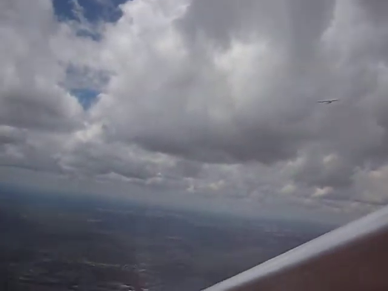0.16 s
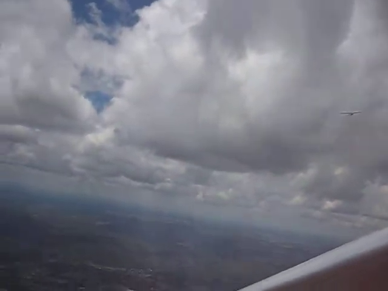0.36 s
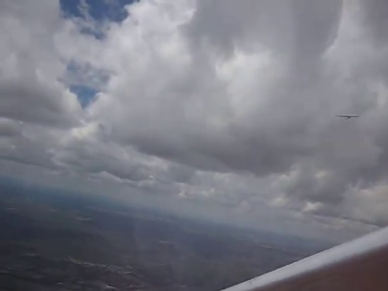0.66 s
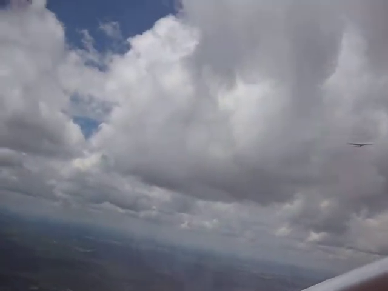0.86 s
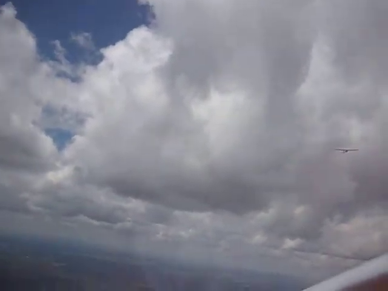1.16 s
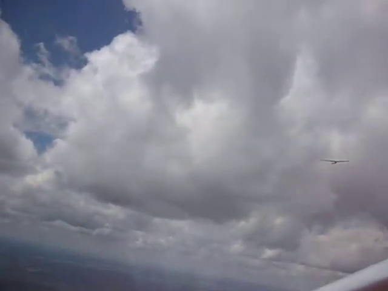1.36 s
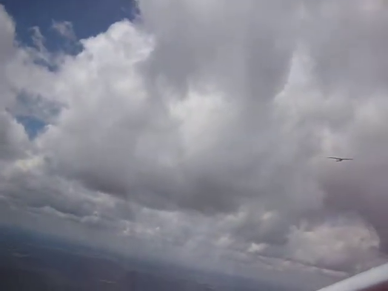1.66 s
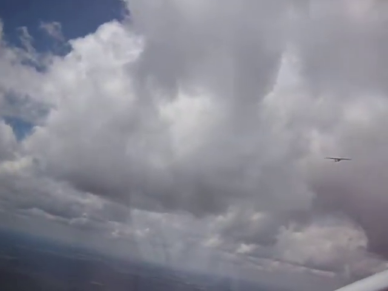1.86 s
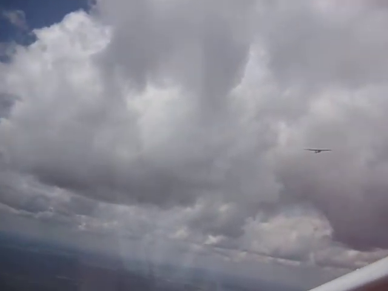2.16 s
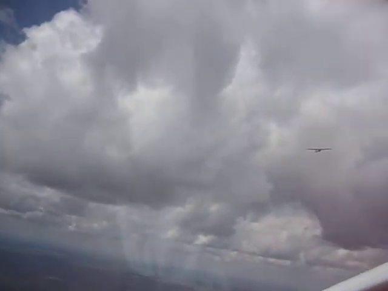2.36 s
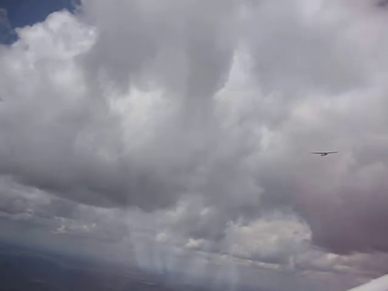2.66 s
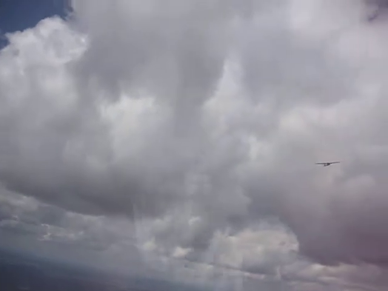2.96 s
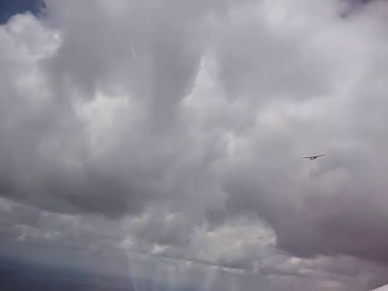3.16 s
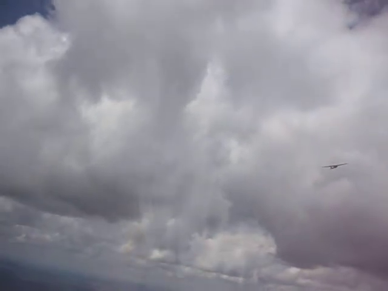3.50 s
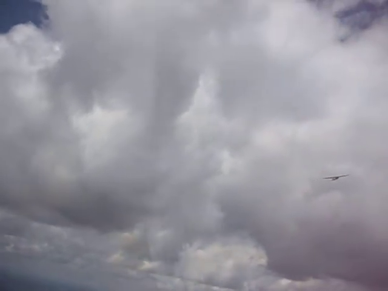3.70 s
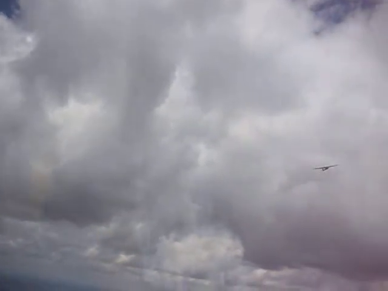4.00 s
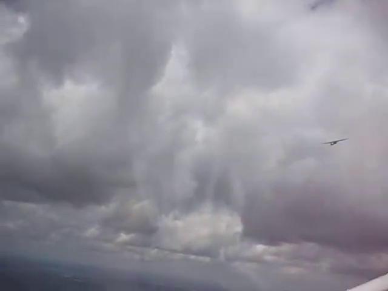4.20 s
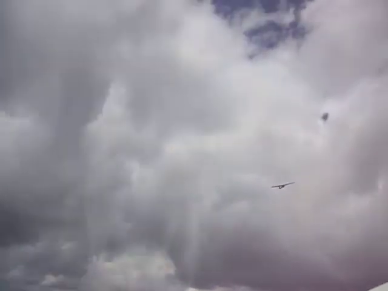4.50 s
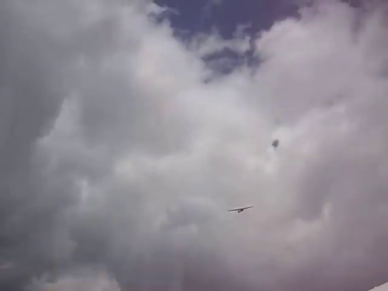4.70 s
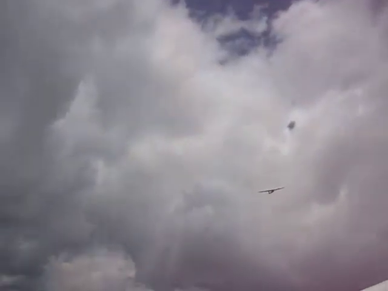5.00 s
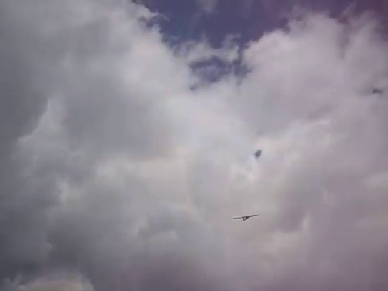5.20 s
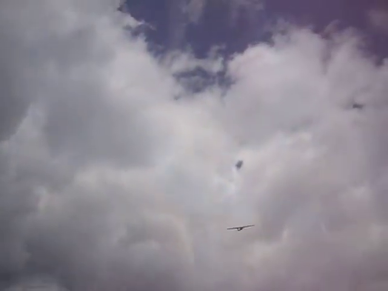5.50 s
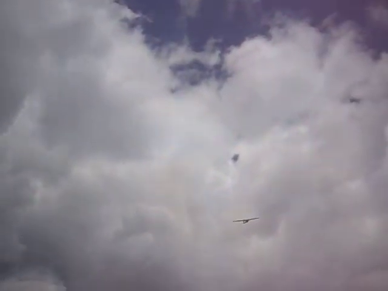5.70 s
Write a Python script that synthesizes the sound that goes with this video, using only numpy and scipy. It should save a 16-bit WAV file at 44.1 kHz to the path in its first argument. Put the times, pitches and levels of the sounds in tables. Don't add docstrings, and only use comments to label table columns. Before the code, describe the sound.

Steady wind rush heard inside a glider cockpit, deep rumbling and buffeting under a dull airy hiss, with one faint click midway.

```python
import sys
import numpy as np
from scipy import signal
from scipy.fft import rfft, irfft
from scipy.io import wavfile
from scipy.ndimage import uniform_filter1d

SR = 44100
rng = np.random.default_rng(int(sys.argv[2]) if len(sys.argv) > 2 else 0)


def to_linear_factor(level_db):
    exponent = np.asarray(level_db, float) / 20
    return 10 ** exponent


def persist_wave(psi):
    counts = np.round(np.clip(psi, -1, 1) * 32767).astype(np.int16)
    wavfile.write(sys.argv[1], SR, np.atleast_2d(counts).T)


N = 257984


def evened(x):
    return x / np.sqrt(np.mean(abs(x) ** 2) + 1e-20)


def read(points, hz):
    point_hz, point_db = np.transpose(points)
    return np.interp(np.log(hz + 1), np.log(point_hz + 1), point_db)


def camera_facing(t):
    # time in seconds, facing from 0 (away from the canopy) to 1 (towards it).
    turns = [
        (0, 0.46),
        (0.801, 0.16),
        (1.4, 0.091),
        (1.801, 0.59),
        (2.602, 0.71),
        (3.401, 1),
        (4.4, .9),
        (4.799, 0.28),
        (5.401, 0.35),
        (5.85, 0.52),
    ]
    return np.interp(t, *np.transpose(turns))


def flow(t, mean_db, share, facing_db):
    # time in seconds, level in dB.
    stream = [(0, -33), (.13, -30.5), (.3, -32.5), (.5, -31.5), (.78, -34), (1.14, -31.5), (1.45, -33.5),
              (1.75, -31.5), (2.02, -30), (2.24, -32.5), (2.5, -30.5), (3.0, -30.5), (3.62, -31.5),
              (3.9, -30.5), (4.53, -31), (4.72, -35), (5.2, -33), (5.72, -31.5)]
    stream_mean_db = -33
    swing_db = np.interp(t, *np.transpose(stream)) - stream_mean_db
    return mean_db + share * swing_db + facing_db * (camera_facing(t) - 0.5)


def lulls(t, column):
    # centre in seconds, thud change in dB, buffet change in dB, drumming change in dB.
    pockets = [(0.0, -4, -1.5, 0.5), (0.45, -0.7, -3.5, 0.6), (0.95, -4.5, 1.7, 0), (1.1, .1, -1.5, 0.5),
               (1.3, 2, 1.7, -0.7), (1.48, -6.5, 1, -1), (1.76, 1, -5, .8), (2.05, -3.5, 0.5, -0.3),
               (2.3, -1.5, -2, -0.1), (2.75, -2.5, 2.2, 0.5), (2.99, 1.8, -4.5, -0.5), (3.1, -1.5, .1, 1.4),
               (3.62, -5.5, 0, -0.5), (3.9, 0.5, 2.5, -1.1), (4.25, 1.5, 1.5, 0.5), (4.88, -1.3, -2, -0.6),
               (5.15, -1, -1.1, .6), (5.38, 2.5, 0.4, 0), (5.5, -5, -4.5, -0.8), (5.68, -0.2, -0.3, 1),
               (5.85, 2.5, 3, -1)]
    width_s = 0.09
    return sum(row[column] * np.exp(-0.5 * ((t - row[0]) / width_s) ** 2) for row in pockets)


def cockpit_rings(hz, facing):
    # frequency in Hz, width in Hz, gain facing away in dB,
    # gain facing the canopy in dB (negative gains thin the sound, as at a node).
    cockpit_modes = [(33, 14, 6, 3), (66, 24, 4.5, 7), (121, 75, 4, 0), (253.8, 70, 6, 9.5),
                     (318, 5.7, 8, 3), (389, 16, 10, -5), (395, 10, -5.5, -2.5), (457.7, 60, 7.5, 9.5),
                     (551.5, 29, 7, 10.5), (578, 12, -8.5, -3.5), (640, 100, 2.5, 2.5), (709, 68, 4, 5),
                     (759, 30, -4, -3.5), (818, 52, 2, 6.5), (884, 33, 3, -0.5), (1098, 44, 6.5, 3.5),
                    (1226, 52, 5.5, 6), (1326, 80, 5, 5), (1786, 46, 1.5, 6), (1860, 79, 3, -1),
                    (2130, 88, 0, 3.5), (2720, 67, -1.5, 4), (3030, 94, -0.5, 3)]
    rings_db = 0
    for mode_hz, width_hz, away_db, toward_db in cockpit_modes:
        peak = 1 / (1 + (2 * (hz - mode_hz) / width_hz) ** 2)
        rings_db = rings_db + np.outer(peak, away_db + facing * (toward_db - away_db))
    return rings_db


def turbulence(spectrum, size, patchy_db, flicker_db, patch_hz):
    hop = size // 4
    frames = N // hop + 5
    hz = np.fft.rfftfreq(size, 1 / SR)
    real, imaginary, patches = rng.standard_normal((frames, len(hz), 3)).T
    span = max(int(patch_hz * size / SR), 1)
    patches = uniform_filter1d(patches, size=span, axis=0)
    patches = evened(uniform_filter1d(patches, size=4, axis=1))
    flicker = rng.standard_normal(frames)
    facing = np.clip(camera_facing(np.arange(frames) * hop / SR), 0, 1)
    colour = to_linear_factor(read(spectrum, hz)[:, None] + cockpit_rings(hz, facing))
    colour = colour / np.sqrt((colour ** 2).mean(axis=0))
    spectra = (real + 1j * imaginary) * colour * to_linear_factor(patchy_db * patches + flicker_db * flicker)
    return evened(signal.istft(spectra, nperseg=size, noverlap=size - hop)[1][:N])


def hiss(t):
    # frequency in Hz, level in dB per Hz.
    gap_spectrum = [(650, -29), (950, -3), (1500, -2.5), (2400, -6), (3450, -8), (4300, -12), (5030, -14.5),
                    (6500, -18), (8000, -46)]
    air = turbulence(gap_spectrum, size=4096, patchy_db=0.6, flicker_db=0.44, patch_hz=120)
    return to_linear_factor(flow(t, mean_db=-34, share=1, facing_db=0.1)) * air


def drumming(t):
    # frequency in Hz, level in dB per Hz.
    canopy_spectrum = [(140, -34), (190, -4), (300, -4), (420, -6), (600, -7.5), (760, -11), (950, -13.5),
                       (1300, -51.5)]
    level_db = flow(t, mean_db=-27.5, share=0.9, facing_db=-2.6) + lulls(t, column=3)
    return to_linear_factor(level_db) * turbulence(canopy_spectrum, size=8192, patchy_db=1.0, flicker_db=-0.2, patch_hz=120)


def buffet(t):
    # frequency in Hz, level in dB per Hz.
    skin_spectrum = [(60, -38), (85, -8.5), (105, -1.5), (155, -1), (185, -11), (240, -61.5)]
    level_db = flow(t, mean_db=-24.5, share=0.44, facing_db=0.1) + lulls(t, column=2)
    return to_linear_factor(level_db) * turbulence(skin_spectrum, size=8192, patchy_db=0.5, flicker_db=1.2, patch_hz=40)


def thud(t):
    # frequency in Hz, level in dB per Hz.
    fuselage_spectrum = [(8, -9), (20, -1), (45, -1), (80, -2), (100, -5.5), (130, -47.5)]
    level_db = flow(t, mean_db=-22.5, share=0.15, facing_db=0.1) + lulls(t, column=1)
    return to_linear_factor(level_db) * turbulence(fuselage_spectrum, size=8192, patchy_db=-0.66, flicker_db=0.5, patch_hz=30)


def scene():
    t = np.arange(N) / SR
    return (hiss(t) + drumming(t) + buffet(t) + thud(t))[None]


def dropout(t):
    # time in seconds, jump in dB, fade in milliseconds.
    lost_samples = (2.48526, -15.7, 2.5)
    start_s, jump_db, fade_ms = lost_samples
    fade = np.exp(-np.maximum(t - start_s, 0) * 1000 / fade_ms)
    step = to_linear_factor(jump_db) * fade * (t >= start_s)
    lowpass = signal.firwin(281, 15800, window=("kaiser", 6), fs=SR)
    return signal.oaconvolve(step, lowpass, "same")


def band_limit(x):
    # frequency in Hz, gain in dB.
    edge = [(4800, 0), (5200, -1), (5500, -5), (5750, -11.5), (6000, -23), (6200, -35), (6300, -55),
            (6400, -120)]
    spectrum = rfft(x)
    fold = N // 8
    mirror = spectrum[:, fold:0:-1].conj()
    mirrored = np.concatenate([spectrum[:, :fold], mirror, spectrum[:, 2 * fold:]], axis=1)
    return irfft(mirrored * to_linear_factor(read(edge, np.fft.rfftfreq(N, 1 / SR))), N)


def top_cut(x):
    return signal.sosfilt(signal.butter(12, 16700, fs=SR, output="sos"), x)


def record(dry):
    overload_db, offset = -9.6, -0.0053
    clipped = np.clip(dry, -to_linear_factor(overload_db), to_linear_factor(overload_db))
    mix = band_limit(clipped) + offset + dropout(np.arange(N) / SR)
    return top_cut(mix)


dry = scene()
out = record(dry)
persist_wave(out)
```